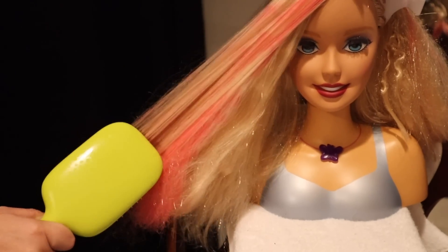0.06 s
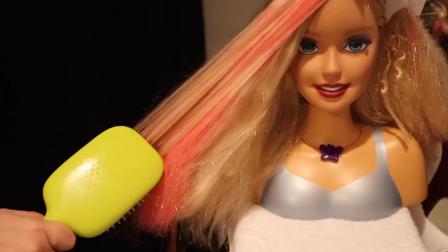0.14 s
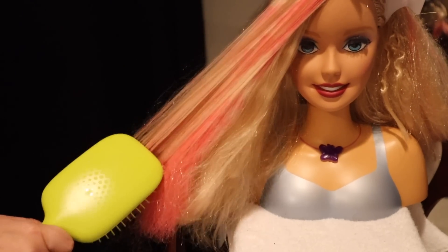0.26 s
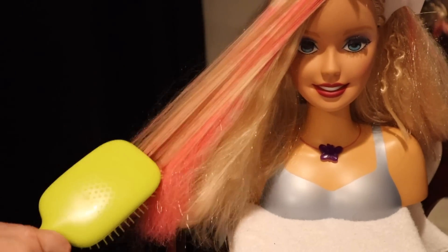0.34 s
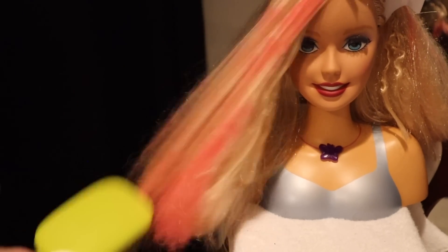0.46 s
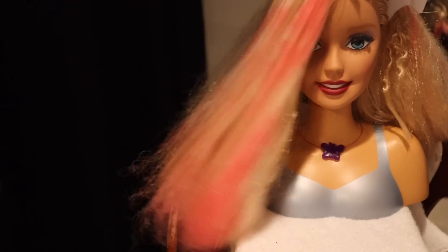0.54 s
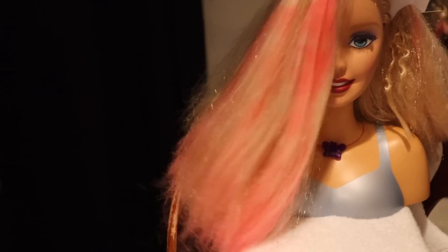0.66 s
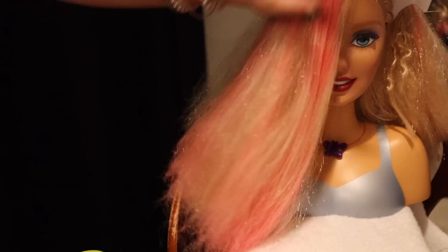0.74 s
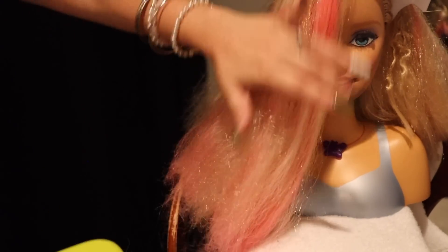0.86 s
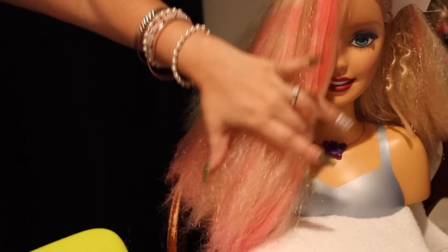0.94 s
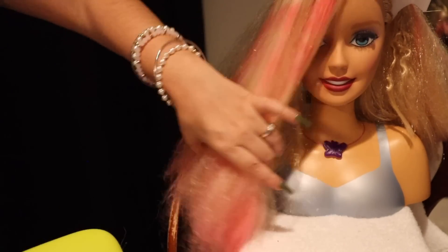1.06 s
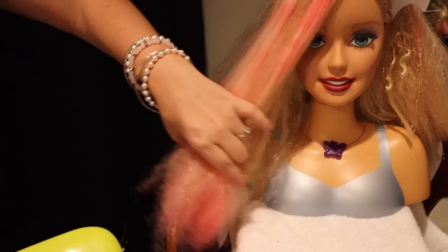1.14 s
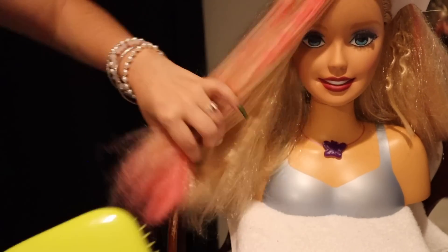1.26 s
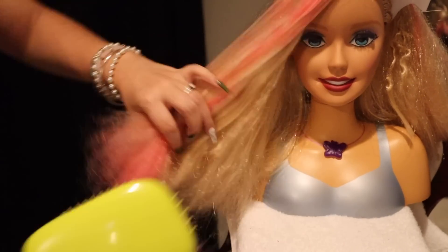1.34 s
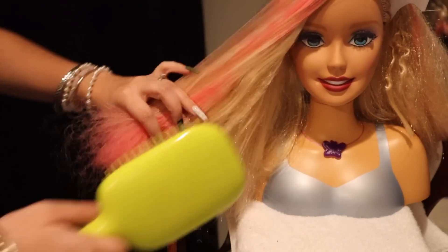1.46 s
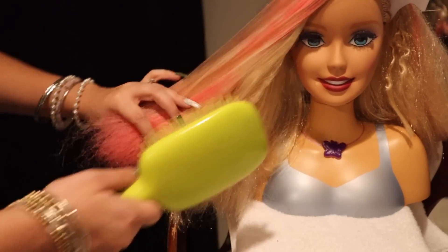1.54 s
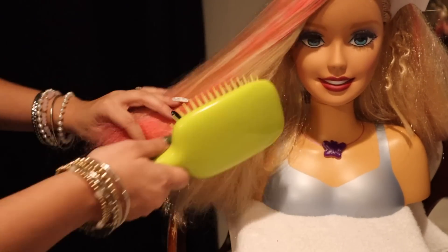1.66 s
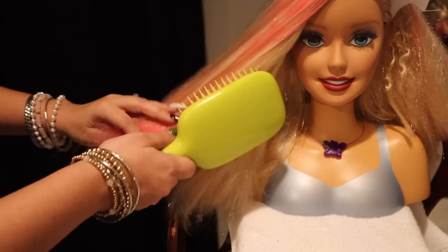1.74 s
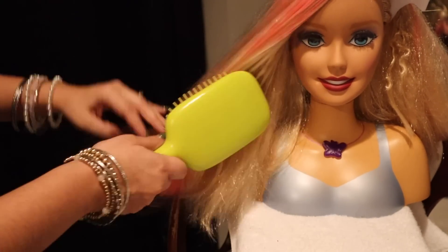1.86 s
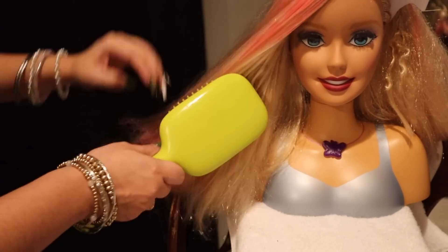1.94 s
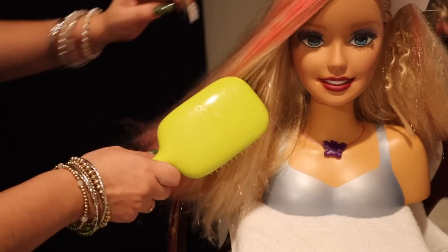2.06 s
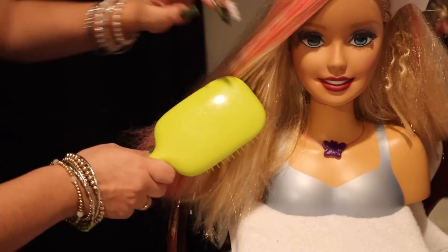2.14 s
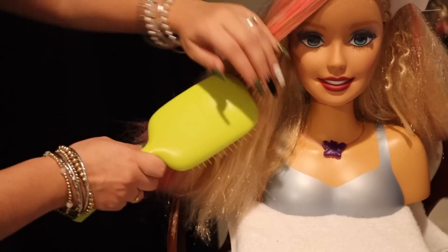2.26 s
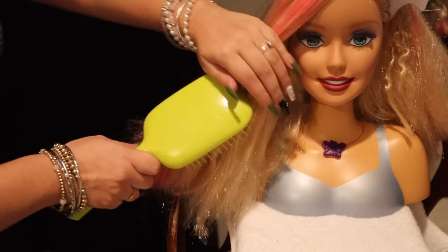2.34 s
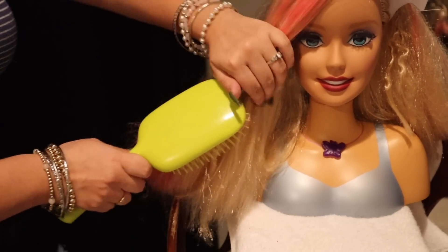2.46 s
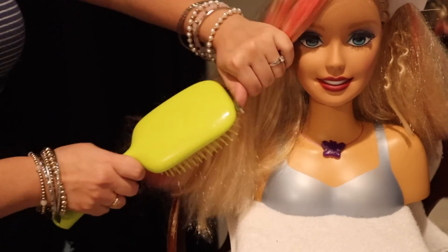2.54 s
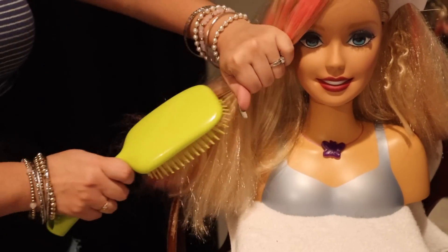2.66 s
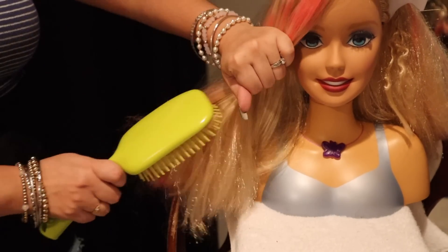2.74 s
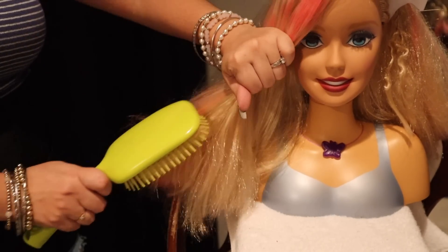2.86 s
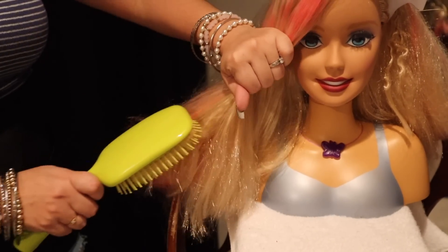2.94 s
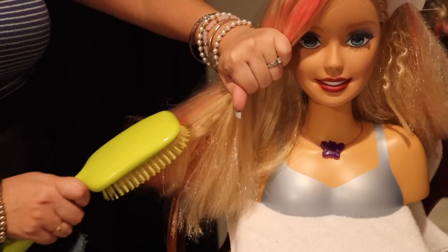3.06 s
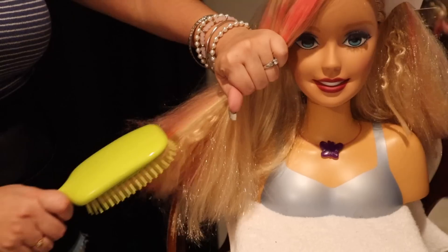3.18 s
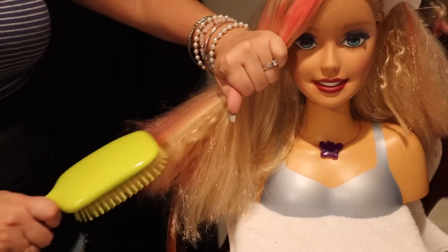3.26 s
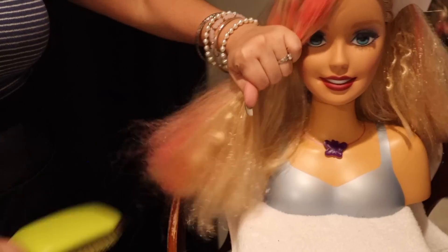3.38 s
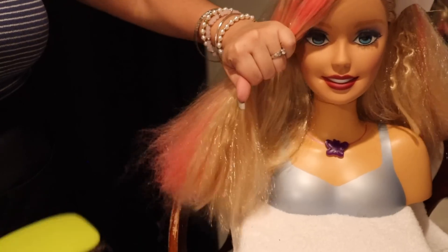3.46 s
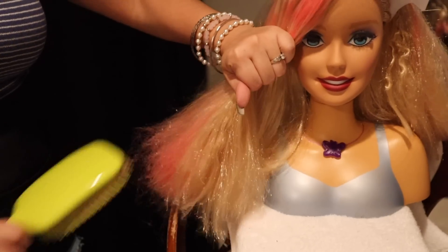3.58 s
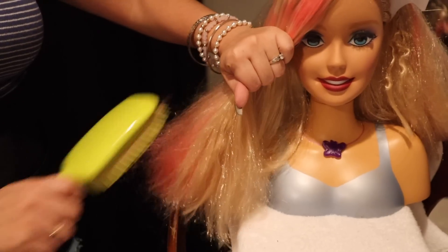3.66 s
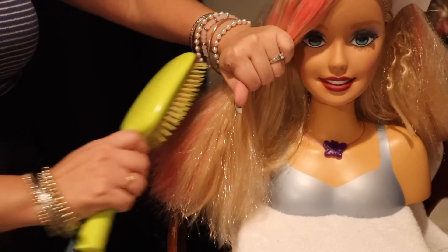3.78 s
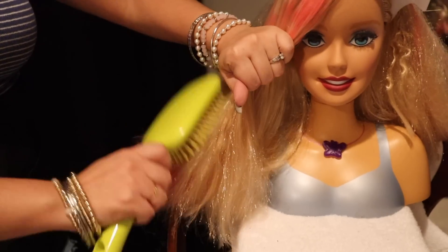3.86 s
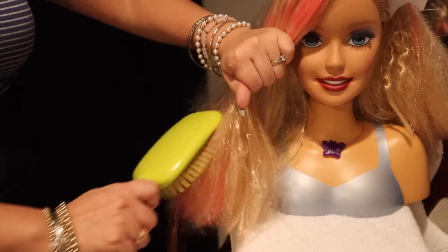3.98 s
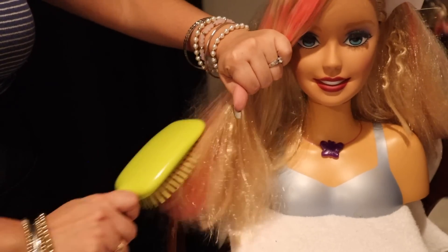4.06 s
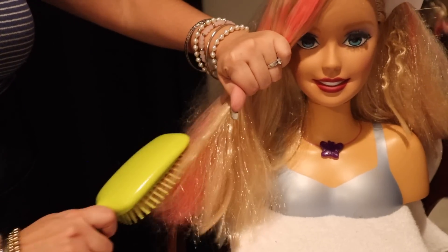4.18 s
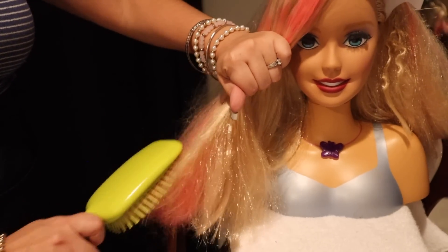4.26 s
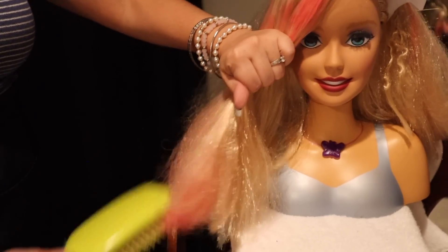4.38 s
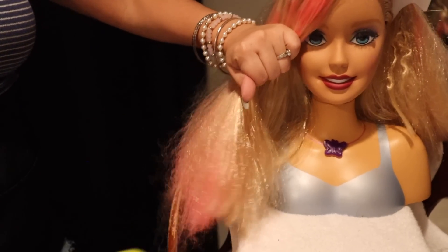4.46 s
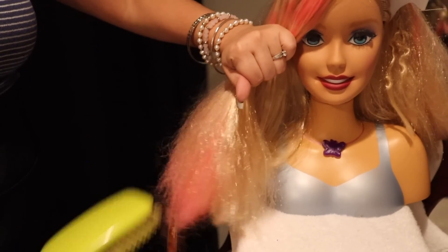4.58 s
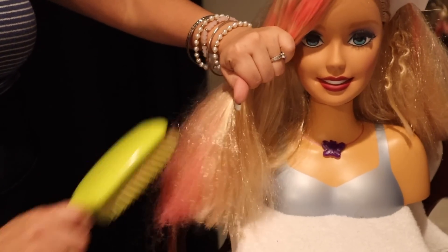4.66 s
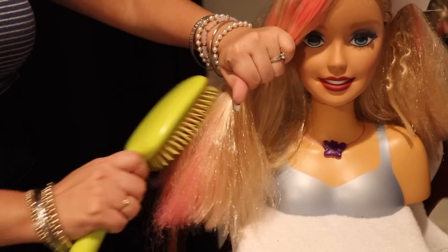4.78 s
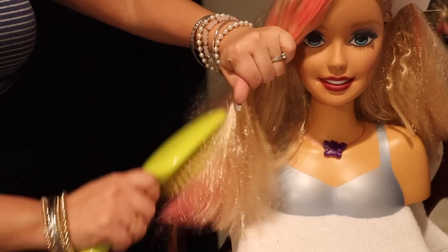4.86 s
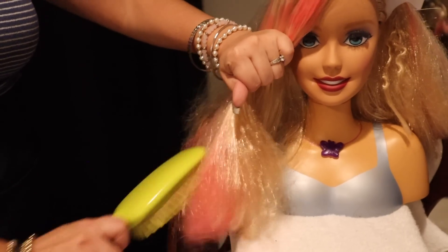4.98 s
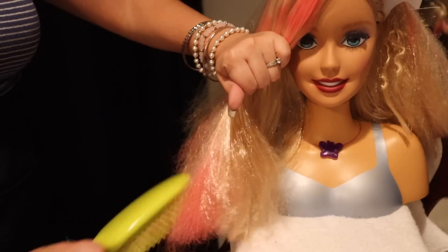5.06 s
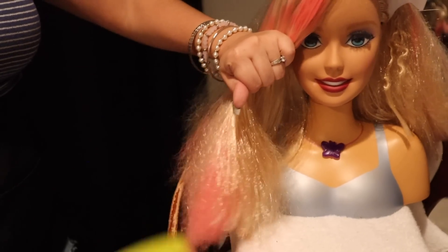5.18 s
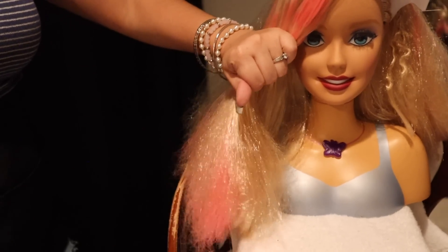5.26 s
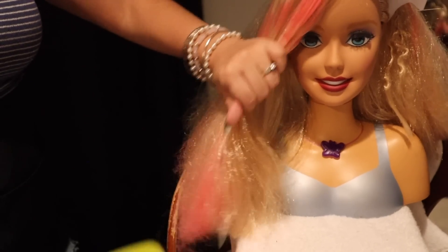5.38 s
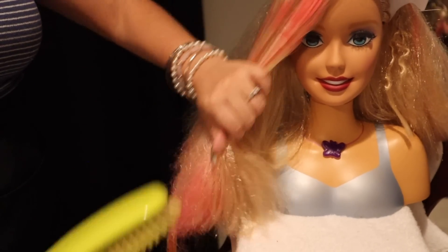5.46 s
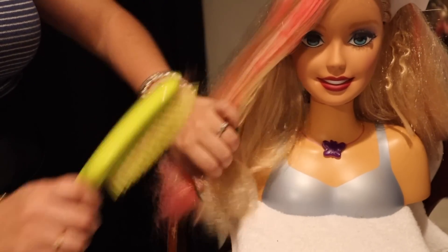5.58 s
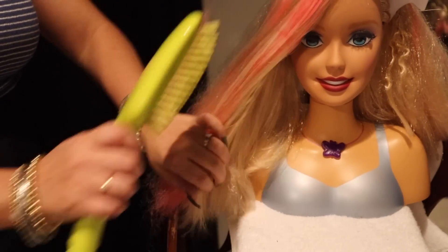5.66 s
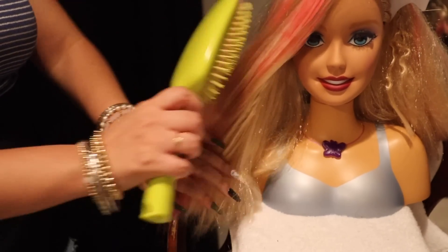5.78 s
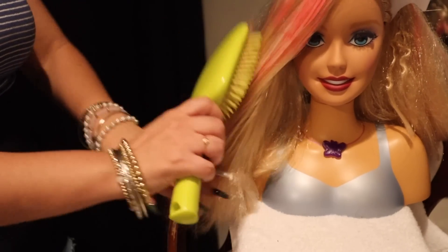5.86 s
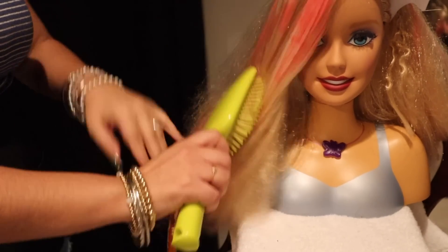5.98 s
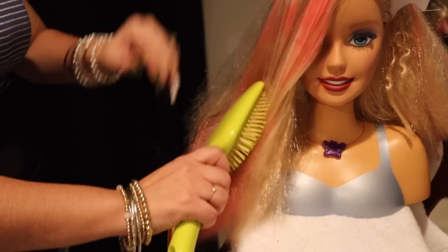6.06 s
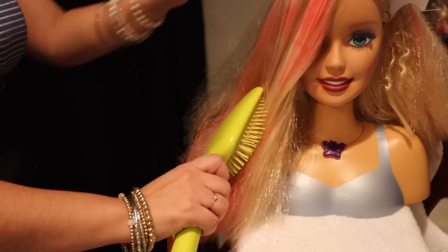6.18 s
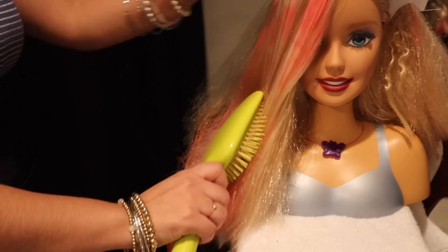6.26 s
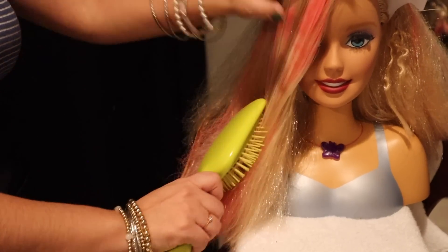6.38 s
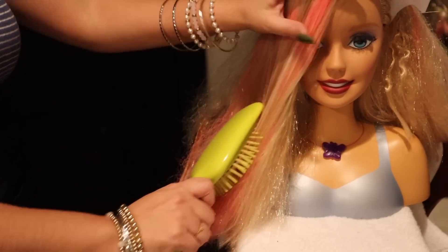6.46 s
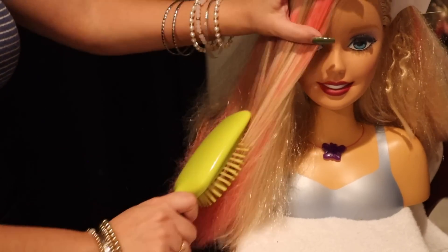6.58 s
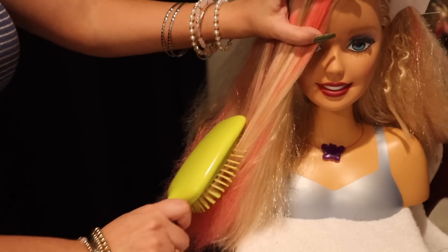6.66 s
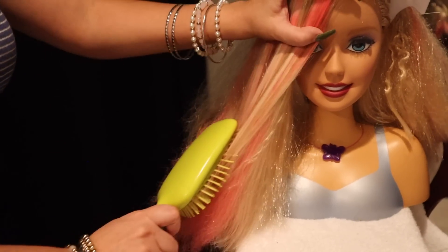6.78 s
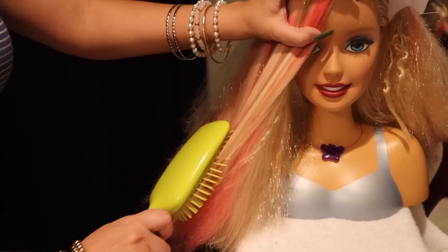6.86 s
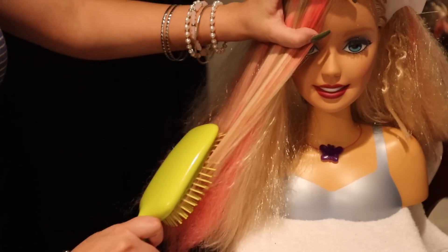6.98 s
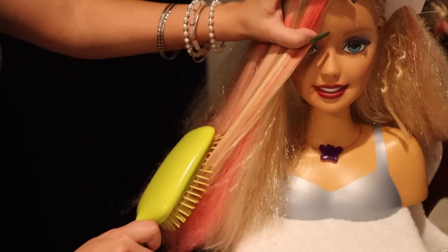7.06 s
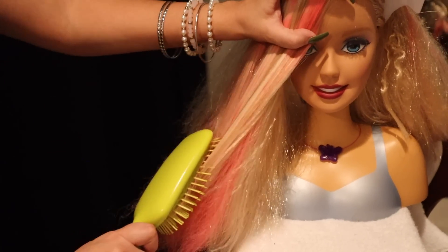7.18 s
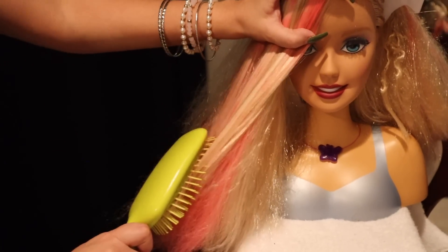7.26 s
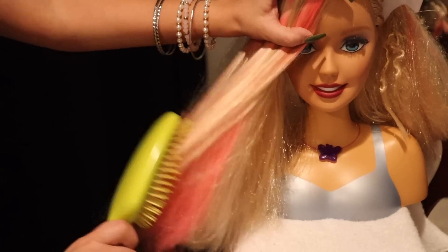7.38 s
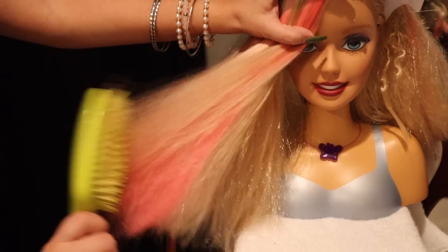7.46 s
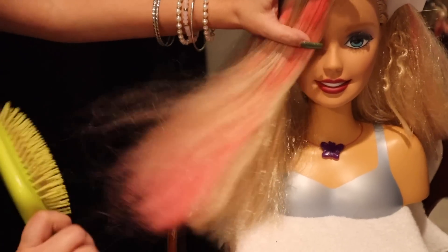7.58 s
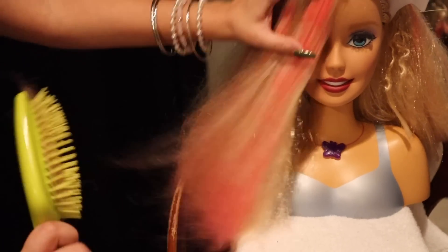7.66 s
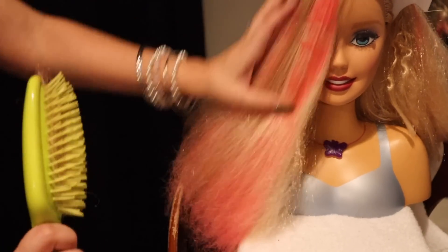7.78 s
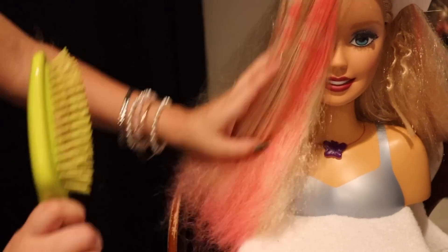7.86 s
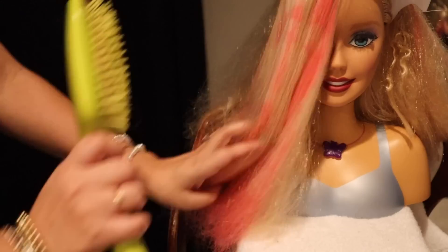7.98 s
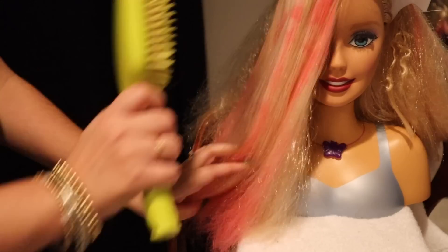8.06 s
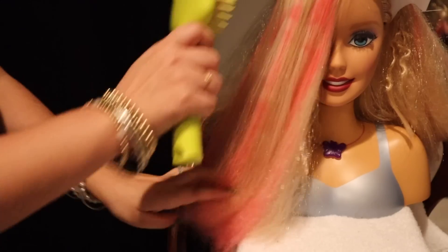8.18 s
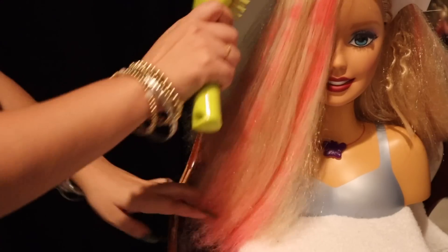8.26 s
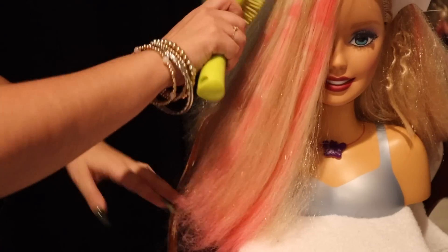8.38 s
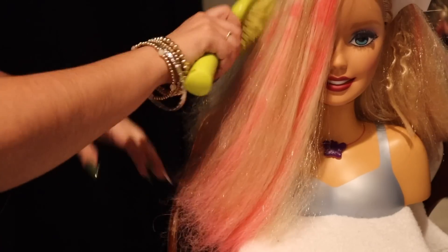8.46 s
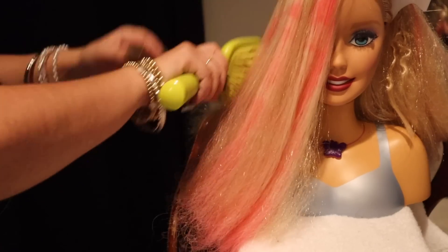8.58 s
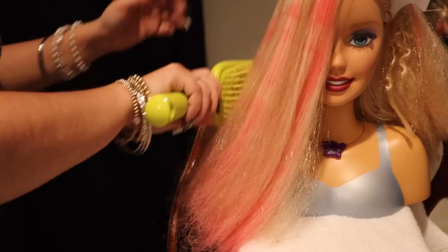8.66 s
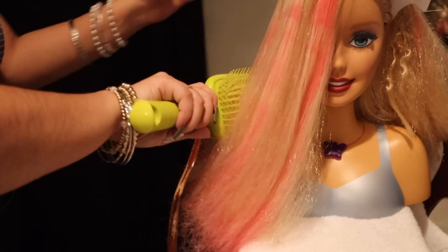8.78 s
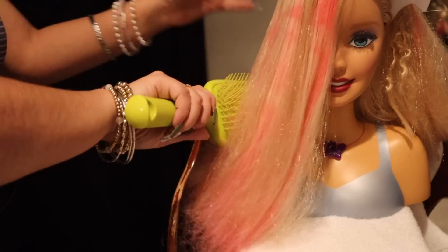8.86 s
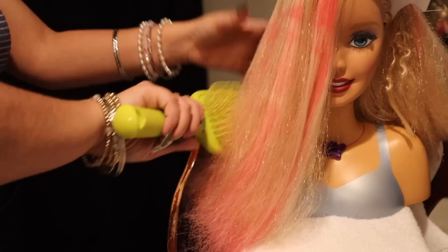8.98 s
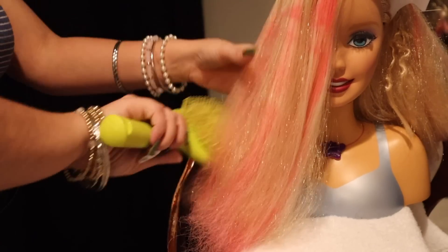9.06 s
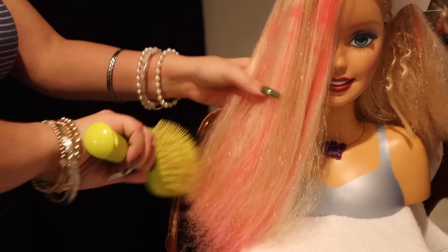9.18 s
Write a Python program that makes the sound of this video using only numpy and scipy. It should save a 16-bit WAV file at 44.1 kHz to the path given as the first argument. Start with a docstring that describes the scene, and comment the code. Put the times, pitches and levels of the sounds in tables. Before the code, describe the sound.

A plastic paddle brush scrapes and snaps through a doll's tangled synthetic hair while thin metal bangles clink and jangle in a quiet room.

```python
"""A plastic paddle brush is pulled through a doll's tangled hair, close to a mono camera microphone in a quiet room.
Slipping hairs and knots letting go are random impulses and noise bursts that ring the brush, bristles and head.
Thin metal bangles on both wrists clink as decaying sines and jangle as dense filtered impulses; late on, the brush
bumps the stand with low swings. A short room answer, a hum, uneven rumble and hiss lie around and underneath."""
import sys
import numpy as np
from scipy import signal
from scipy.fft import rfft, irfft, next_fast_len
from scipy.io import wavfile

SR = 44100
rng = np.random.default_rng(int(sys.argv[2]) if len(sys.argv) > 2 else 0)


def unload_audio(sound):
    """Save the sound as a 16-bit wav file, at the path given as the first command line argument."""
    columns = np.transpose(np.atleast_2d(sound))
    # keep every value between -1 and 1, then stretch to whole-number steps
    steps = np.round(np.clip(columns, -1, 1) * 32767)
    wavfile.write(sys.argv[1], SR, steps.astype(np.int16))


N = 407043

# Brush strokes, one list of rows each, before trim.
# Each row: time in seconds, drag on the brush in dB, tug on the head in dB, bristle crackle in dB.
STROKES = [
    [(0.0, -51, -51, -62), (0.04, -66, -60, -77), (0.104, -59, -54, -65), (0.38, -62, -61, -72),
     (0.456, -45, -44, -61), (0.54, -38, -40, -44), (0.572, -48, -52, -50), (0.72, -58, -64, -67)],
    [(1.3, -58, -73, -57), (1.32, -62, -63, -61), (1.504, -47, -60, -52), (1.548, -56, -73, -61),
     (1.582, -65, -59, -68), (1.62, -60, -73, -62)],
    [(2.4, -60, -61, -62), (2.988, -53, -52, -61), (3.156, -52, -55, -61), (3.28, -45, -46, -60)],
    [(3.28, -47, -52, -62), (3.344, -34.5, -34, -44), (3.446, -43, -49, -46), (3.474, -51, -51, -57),
     (3.492, -27, -34, -35), (3.518, -37, -32, -39), (3.562, -51, -58, -50), (3.62, -58, -54, -61)],
    [(3.9, -74, -62, -77), (3.92, -46, -55, -46), (3.964, -51, -49.5, -66), (4.17, -51, -49, -53),
     (4.214, -42, -45, -54), (4.262, -54, -54, -67), (4.298, -51, -38, -56), (4.342, -43, -42, -51),
     (4.446, -42, -36, -56), (4.58, -71, -73, -77)],
    [(4.93, -48, -50, -54), (4.944, -56, -49, -56), (4.954, -35, -45, -48), (5.026, -45, -46, -51),
     (5.126, -39, -42, -53), (5.148, -44, -39, -54), (5.23, -41, -47, -54), (5.236, -46, -46, -49)],
    [(5.95, -68, -63, -76), (5.978, -59, -55, -69), (6.426, -58, -63, -72), (6.454, -53, -46, -53),
     (6.504, -56, -60, -73), (6.638, -47, -48, -54), (6.662, -54, -56, -59), (6.87, -49, -49, -54),
     (6.956, -51, -44, -63), (6.976, -60, -54, -61), (7.018, -42, -50, -50), (7.106, -49, -46, -59),
     (7.168, -68, -64, -75), (7.212, -42, -46, -61), (7.23, -57, -55, -65), (7.386, -54, -58, -59),
     (7.452, -36.5, -35, -45), (7.516, -34.5, -34.5, -47), (7.64, -69, -66, -75), (7.68, -72, -55, -70)],
    [(8.55, -59, -58, -62), (8.678, -58, -57, -61), (9.074, -54, -55.5, -61), (9.23, -46, -46, -61)],
]
# Faint handling all along. Each row: one level in dB, for drag, tug and crackle in turn.
FAINT_HANDLING = [
    [-62],
    [-59],
    [-63.5],
]
# Knots letting go and knocks, before trim.
# Each row: start in seconds, level in dB of back, rim, head and bristle tips.
SNAP_BLOWS = [(.083, -53, -49, -48, -66), (.372, -62, -62, -66, -47), (.442, -33, -46, -40, -59),
              (.515, -29, -40, -38, -48), (.536, -40, -38, -37, -40), (1.027, -47, -50.5, -50, -48),
              (1.172, -55, -60, -66, -37), (1.367, -56, -44, -64, -50), (1.378, -58, -48, -64, -47),
              (1.415, -57, -49, -58, -41), (1.45, -57, -44, -62, -52), (1.473, -53, -39.5, -58, -50),
              (1.497, -55, -40, -62, -48), (1.51, -55, -40, -62, -50), (1.525, -57, -44, -62, -54),
              (2.451, -26, -30, -38, -49), (2.735, -26, -31, -37, -36.5), (2.81, -36, -33, -44, -55),
              (2.823, -30.5, -21.5, -29, -32.5), (2.883, -26, -23.5, -30, -32), (2.926, -40, -50, -38, -61),
              (3.087, -50, -40, -53, -52), (3.125, -23, -22.5, -34.5, -44.5), (3.223, -39, -41, -40, -59),
              (3.296, -48, -33, -46, -39), (3.322, -32, -20, -42, -40), (3.345, -36, -27, -32, -33),
              (3.389, -29, -27.5, -33, -24), (3.418, -43, -39, -49, -27), (3.44, -43, -38, -50, -24),
              (3.488, -35, -23.5, -40, -43), (3.498, -45, -24, -35, -30), (3.916, -39, -47, -47, -36),
              (4.107, -54, -52, -50, -47), (4.141, -53, -46, -48, -46), (4.216, -30, -43, -45, -58),
              (4.3, -50, -52, -37, -57), (4.953, -26, -31, -45, -48), (4.979, -28.5, -30, -43, -39),
              (5.03, -45, -42, -50, -44), (5.047, -32, -40, -46, -36.5), (5.279, -45, -33, -60, -36),
              (6.166, -58, -47, -62, -43), (6.455, -52, -48, -47, -45), (6.608, -46, -43, -42, -48),
              (6.732, -54, -38.5, -47, -46), (6.813, -57, -46, -47, -47), (6.855, -47, -37.5, -50, -45),
              (6.885, -46, -45, -42, -46), (6.945, -38, -56, -37.5, -49), (7.007, -46, -39, -46, -49),
              (7.034, -36, -40, -45, -39), (7.086, -34.5, -42, -37, -48), (7.205, -54, -37, -47.5, -46),
              (7.299, -53, -44, -60, -46), (7.34, -52, -46, -55, -48), (7.407, -50, -39, -44, -39),
              (7.425, -32, -40, -34, -34), (7.442, -27, -40, -34, -39), (7.459, -27, -33, -32, -33.5),
              (7.5, -22, -39, -37, -41), (7.513, -25, -33, -40, -31), (7.591, -43, -51, -48, -40),
              (8.756, -35, -30.5, -43, -32.5), (8.784, -35, -28.5, -38, -26), (9.19, -31, -43, -46, -49.5)]
SNAP_T60_S, PAD_UNDER_DB = .021, 9  # burst decay; the pad lies under the mean of rim and tips
# Something hard strikes the brush. Each row: start in seconds, level in dB before trim.
HARD_BLOWS = [(4.839, -16.5), (5.25, -19.5), (8.493, -18.5)]
# Share of a hard blow: back, rim, head, pad and tips, in dB relative to its level.
HARD_BLOW_SHARES = [-8, -12, -21, -8.5, 0]
HARD_BLOW_T60_S = .038
# Resonances of the brush's hollow back. Each row: centre in Hz, width in Hz, level in dB.
BACK_MODES = [(498, 41, 0.5), (648.4, 72, 1.6)]
# Resonances of its stiff rim. Each row: centre in Hz, width in Hz, level in dB.
RIM_MODES = [(869, 89, -0.5), (1077, 100, -3), (1221, 87, -2), (1373, 98, -4.5)]
# Resonances of the doll's head on its stand. Each row: centre in Hz, width in Hz, level in dB.
HEAD_MODES = [(159, 44, -4.5), (238.8, 57, 1), (403.4, 97, -1)]
# Resonances of the bristle pad. Each row: centre in Hz, width in Hz, level in dB.
PAD_MODES = [(1530, 400, -0.5), (1954, 310, 4.5), (2420, 800, -1), (4100, 2600, -9.5)]
# Resonances of the bristle tips. Each row: centre in Hz, width in Hz, level in dB.
TIP_MODES = [(3414, 64, 0.2), (4150, 640, 5.5), (4935, 150, -5), (5970, 2500, -10), (10000, 3700, -18)]

# Decay of the room's answer. Each row: frequency in Hz, t60 in seconds.
ROOM_DECAY = [(200, 0.11), (2000, 0.21), (12000, 0.098)]

# The hum: frequency in Hz, width in Hz of each wavering resonance, rms in dB before the microphone.
HUM_TONE = (56.5, 5.6, -54)
# Rumble before the microphone. Each row: time in seconds, deep rms in dB, upper rms in dB.
RUMBLE_LEVELS = [(0.0, -54, -56), (0.23, -69, -61), (0.54, -54, -54.5), (0.97, -72, -58.5),
                 (1.28, -50, -58), (1.67, -65, -62), (3.16, -57, -59.5), (3.44, -49, -57),
                 (3.73, -63, -60.5), (8.17, -58, -58.5), (8.61, -72, -63), (8.82, -46, -52.5),
                 (9.18, -67, -62), (9.23, -61, -58)]
# Colour of the hiss. Each row: frequency in Hz, relative level in dB.
HISS_COLOUR = [(41, 8.5), (70, -7), (203, -6), (482, -18.5), (552, -35), (662, -18), (813, -10.5),
               (2160, -16.5), (4560, -16.5), (14900, -21.5), (15900, -35)]
HISS_DB = -53  # rms before the microphone's band limits

# Modes of the low slim bangle. Each row: frequency in Hz, level in dB, t60 in seconds.
SLIM_LOW_MODES = [(5147, -15, .22), (8290, 0, .3), (8358, -11, .2)]
# Modes of the high slim bangle. Each row: frequency in Hz, level in dB, t60 in seconds.
SLIM_HIGH_MODES = [(12125, 0, .22), (12195, -4, .2)]
# Modes of the wide bangle. Each row: frequency in Hz, level in dB, t60 in seconds.
WIDE_MODES = [(4685, -9, .25), (6775, -6, .25), (6895, -9, .25), (9410, -4, .3), (9458, -9, .25),
              (11205, -3, .3), (11280, 0, .3), (12355, -3, .25), (12400, -6, .25)]
# Modes of the beaded bangle. Each row: frequency in Hz, level in dB, t60 in seconds.
BEADED_MODES = [(1980, -17, .08), (3525, -12, .15), (5190, -14, .12), (6610, -8, .15), (6690, -5, .15),
                (8340, -9, .12), (9080, -9, .12), (9180, -8, .15), (10660, -4, .15), (10745, 0, .15),
                (11790, -8, .15), (12225, -4, .15), (12300, -7, .15), (12960, -10, .12), (15090, -7, .15),
                (15520, -6, .15), (15640, -4, .15)]
# Modes of the small bangle. Each row: frequency in Hz, level in dB, t60 in seconds.
SMALL_MODES = [(9905, 0, .2), (13000, -9, .15)]
# The grip on the wrist shifts each ring's pitch from blow to blow: spread as a share of pitch,
# for slim low, slim high, wide, beaded and small.
PITCH_SPREAD = [.0008, .001, .0008, .004, .001]
# Bangle contacts, before trim.
# Each row: start in seconds, click level in dB, then a bangle and its ring level in dB for each that rings.
CONTACTS = [(.536, -38, "beaded", -51, "slim low", -51, "slim high", -53),
            (.941, -40, "slim low", -51, "slim high", -49.5), (1.027, -18, "wide", -45),
            (1.063, -24, "wide", -62), (1.086, -25.5, "wide", -60),
            (1.122, -23, "slim low", -45, "slim high", -45), (1.168, -27),
            (1.173, -21, "slim low", -38, "slim high", -47), (1.256, -35, "wide", -63),
            (1.305, -27, "slim high", -49, "slim low", -61), (1.361, -46, "small", -53),
            (1.417, -38, "slim high", -63), (1.465, -42, "beaded", -54), (1.556, -29, "beaded", -53),
            (1.593, -43, "slim high", -51, "beaded", -54), (1.612, -35, "slim low", -56),
            (1.713, -27, "wide", -55), (1.722, -28.5, "wide", -57), (1.743, -33, "beaded", -55),
            (1.768, -34, "beaded", -55), (1.961, -39, "slim low", -51, "slim high", -55, "wide", -60),
            (1.983, -33, "slim high", -53, "beaded", -54), (2.058, -42, "slim high", -52, "small", -55),
            (2.253, -39, "wide", -57), (2.282, -34, "wide", -67), (2.347, -31, "wide", -51.5),
            (2.4, -34, "wide", -54), (2.414, -29.5, "wide", -53), (2.452, -35, "slim low", -59),
            (2.586, -38, "slim low", -55, "slim high", -62), (3.1, -43, "slim low", -58, "slim high", -61),
            (2.822, -33, "wide", -58), (2.7, -33), (3.356, -37, "beaded", -56), (3.39, -38, "small", -54),
            (3.411, -26, "beaded", -53, "slim high", -55), (3.44, -34, "slim high", -54, "small", -58),
            (3.4925, -22, "beaded", -36, "slim high", -46, "slim low", -53),
            (3.565, -31, "beaded", -45, "slim high", -49), (3.577, -23, "beaded", -42),
            (3.657, -28, "wide", -58, "slim high", -60), (3.702, -27, "beaded", -48),
            (3.854, -26.5, "beaded", -61), (3.6, -33, "wide", -61), (3.914, -26, "wide", -64),
            (4.839, -23, "slim high", -42, "beaded", -49, "small", -48),
            (4.849, -18, "beaded", -44, "slim high", -51), (4.97, -34), (5.003, -35, "beaded", -55),
            (5.25, -22, "beaded", -37.5, "slim high", -48), (5.279, -26, "beaded", -56, "wide", -59),
            (5.676, -33, "wide", -55.5), (5.945, -37, "slim high", -57, "slim low", -61),
            (6.166, -17.5, "slim high", -39, "slim low", -46), (6.206, -26, "wide", -57),
            (6.237, -37, "slim high", -53, "slim low", -58),
            (6.424, -36, "slim low", -50, "slim high", -54),
            (6.638, -35, "slim low", -53, "slim high", -58), (6.691, -31, "slim high", -50),
            (6.72, -40, "wide", -54, "beaded", -57), (7.104, -34.5, "wide", -60.5), (7.514, -34),
            (7.59, -35), (7.815, -43, "wide", -49), (7.84, -36, "wide", -51, "beaded", -56),
            (7.4, -34, "beaded", -65), (8.1, -30, "wide", -48.5), (8.13, -28.5, "slim high", -65),
            (8.27, -40, "beaded", -52), (8.31, -36, "small", -61),
            (8.495, -41, "slim high", -51, "beaded", -55),
            (8.511, -38, "beaded", -48, "slim high", -52, "slim low", -56), (8.588, -35, "small", -63),
            (8.702, -37, "slim high", -47, "slim low", -55), (8.756, -32, "wide", -49.5),
            (8.823, -47, "wide", -50.5), (8.885, -32, "beaded", -48), (8.912, -32, "beaded", -58),
            (8.984, -25, "small", -50)]
# The stack of bangles rattling, before trim.
# Each row: peak time in seconds, level in dB, swell and fade in seconds per 31 dB, what shakes.
JANGLES = [(.56, -37, .08, 0.14, "metal"), (1.03, -41, .01, .7, "pearls"),
           (1.484, -45, 0.045, .035, "metal"), (1.608, -47, .11, .11, "metal"),
           (1.76, -49, .12, .12, "metal"), (3.44, -38, 0.12, .1, "metal"),
           (3.494, -21.5, .012, 0.053, "metal"), (3.578, -34.5, .025, 0.085, "metal"),
           (3.708, -40, .2, 0.079, "metal"), (3.922, -49, .23, .085, "metal"),
           (4.848, -26, 0.017, .04, "metal"), (5.024, -40.5, 0.05, 0.028, "metal"),
           (5.27, -35.5, 0.043, 0.12, "metal"), (6.169, -26, 0.0055, 0.017, "pearls"),
           (8.522, -38.5, 0.065, .05, "metal"), (8.916, -52, .15, .04, "metal"),
           (8.988, -33.5, .011, 0.038, "metal")]
# Colour of metal on metal. Each row: frequency in Hz, relative level in dB.
CLICK_COLOUR = [(1000, -26), (3000, -2), (6000, -4), (10000, 2), (16000, -4)]

# The brush bumps the stand.
# Each row: start in seconds, starting level in dB before the microphone, frequency in Hz, t60 in seconds.
STAND_BUMPS = [(8.769, -24.5, 281, 0.087), (8.812, -35, 55.5, 0.18)]

TOP_HZ = 15850  # the camera's band limit


def amp(db):
    """Gain of a level in dB."""
    return 10 ** (np.asarray(db) / 20)


def unit(x):
    """x at rms 1."""
    return x / np.sqrt(np.mean(x ** 2) + 1e-20)


def along(points, hz):
    """(Hz, value) points read on a log frequency axis."""
    f, v = np.transpose(points)
    return np.interp(np.log(hz + 1), np.log(f + 1), v)


def curves(rows, **ends):
    """One value per sample for each column after the time."""
    s, *cols = np.transpose(rows)
    return [np.interp(np.arange(N) / SR, s, c, **ends) for c in cols]


def filtered(x, response):
    """x passed through a complex response of frequency."""
    m = next_fast_len(N + SR // 2)
    return irfft(rfft(x, m) * response(np.fft.rfftfreq(m, 1 / SR)), m)[..., :N]


def resonances(peaks):
    """Causal response of (Hz, width, dB) resonances of alternating sign."""
    def response(f):
        return sum((-1) ** k * amp(db) * 1j * f * w / (c * c - f * f + 1j * f * w)
                   for k, (c, w, db) in enumerate(peaks))
    return response


def coloured(points):
    """Zero-phase response of (Hz, dB) points."""
    return lambda f: amp(along(points, f))


def slips(rate, spread_db):
    """Random impulses, rate a second on average, of uneven size."""
    hits = rng.random(N) < rate / SR
    return hits * rng.standard_normal(N) * amp(spread_db * rng.standard_normal(N))


def softly_pushed(peaks, top_hz):
    """Resonances pushed softly by hair: the force loses its treble above top_hz."""
    return lambda f: resonances(peaks)(f) / (1 + 1j * f / top_hz) ** 2


def brush():
    """Slipping hairs shake the brush, tug the head and flick the bristles; knots let go in short bursts."""
    bodies = (softly_pushed(BACK_MODES, top_hz=1210), softly_pushed(RIM_MODES, top_hz=1910),
              softly_pushed(HEAD_MODES, top_hz=615), softly_pushed(PAD_MODES, top_hz=4300),
              resonances(TIP_MODES))
    slip, tug, flick = [unit(slips(rate, spread_db=5)) + 0.9 * rng.standard_normal(N)
                        for rate in (450, 600, 500)]
    grain = np.array([slip, slip, tug, flick, flick])

    trim_db = [[3.0], [1.6], [-.8]]  # taken off drag, tug and crackle
    strokes = sum(amp(np.array(curves(rows, left=-150, right=-150)) - trim_db) for rows in STROKES)
    drag, pull, crackle = np.hypot(strokes, amp(FAINT_HANDLING))
    tips = np.hypot(strokes[2], amp(-12) * crackle)  # faint handling hardly bends the tips; a stroke does
    body_gain = amp([[-1.5], [-4], [-.1], [-1.2], [-7.5]])
    push = grain * [drag, drag, pull, crackle, tips] * body_gain
    push = np.pad(push, ((0, 0), (0, SR)))

    blows = [(s, [back, rim, head, (rim + tip) / 2 - PAD_UNDER_DB, tip], SNAP_T60_S)
             for s, back, rim, head, tip in SNAP_BLOWS]
    blows += [(s, np.add(db, HARD_BLOW_SHARES), HARD_BLOW_T60_S) for s, db in HARD_BLOWS]
    t = np.arange(SR // 8) / SR
    for s, level_db, t60 in blows:
        burst = amp(-60 * t / t60) * rng.standard_normal((len(bodies), len(t)))
        burst[:, :1] += [[12.5], [11.5], [8.5], [4.5], [3.5]]  # a strong first jerk
        gain = amp(np.add(level_db, [-5.5, -1.5, 6.0, 4.0, -3.5]))
        push[:, round(s * SR):][:, :len(t)] += gain[:, None] * burst

    # each body is levelled by its answer to the even, unshaped grain
    return sum(filtered(p[:N], body) / np.std(filtered(g, body)) for p, g, body in zip(push, grain, bodies))


def room(x):
    """Each frequency of the room's answer, a random tail, dies at its own speed."""
    step, out = SR // 4, np.zeros(N + SR)
    # a fresh random tail every quarter second keeps the answer smooth, with no fixed ringing
    for at in range(0, N, step):
        hz, t, z = signal.stft(rng.standard_normal(SR // 3), SR, nperseg=256)
        decay = amp(-60 * t / along(ROOM_DECAY, hz)[:, None])
        tail = signal.istft(z * decay, SR, nperseg=256)[1]
        answer = signal.fftconvolve(x[at:at + step], tail / np.linalg.norm(tail))
        out[at + 250:][:len(answer)] += answer  # 250 samples behind the direct sound
    return out[:N]


def background():
    """A steady hum with narrow noise around it, two bands of uneven rumble, and coloured hiss."""
    deep_db, upper_db = curves(RUMBLE_LEVELS)
    noise = rng.standard_normal((4, N))
    hz, width, hum_db = HUM_TONE

    def twice(c, w):
        return lambda f: resonances([(c, w, 0)])(f) ** 2

    steady = np.sin(2 * np.pi * hz * np.arange(N) / SR)
    wavering = unit(filtered(noise[0], twice(hz, width)))
    hum = amp(hum_db) * unit(2 * steady + wavering)
    deep = amp(deep_db) * unit(filtered(noise[1], twice(39.3, 19.0)))
    upper = amp(upper_db) * unit(filtered(noise[2], twice(111.0, 64)))
    hiss = amp(HISS_DB) * unit(filtered(noise[3], coloured(HISS_COLOUR)))
    return hum + deep + upper + hiss


def clinks():
    """Each contact is a noise click, and the bangles it touches ring as decaying sines."""
    t = np.arange(SR // 4) / SR
    names = "slim low", "slim high", "wide", "beaded", "small"
    tables = SLIM_LOW_MODES, SLIM_HIGH_MODES, WIDE_MODES, BEADED_MODES, SMALL_MODES
    modes = {name: (np.transpose(m)[..., None], loose)
             for name, m, loose in zip(names, tables, PITCH_SPREAD)}
    out, clicks = np.zeros(N + SR), np.zeros(N + SR)
    for s, click_db, *rings in CONTACTS:
        at = round(s * SR)
        for name, db in zip(rings[::2], rings[1::2]):
            (hz, level, t60), loose = modes[name]
            size, shift, phase = rng.standard_normal((3, len(hz), 1))  # where the blow lands
            swing = np.sin(2 * np.pi * (hz * (1 + loose * shift) * t + phase))
            ring = amp(level + 2.9 * size - 60 * t / t60) * swing
            out[at:][:len(t)] += amp(db - 1.5) * ring.sum(0)
        clicks[at:][:len(t)] += amp(click_db - 7 - 60 * t / 0.021) * rng.standard_normal(len(t))
    return out[:N] + filtered(clicks[:N], coloured(CLICK_COLOUR))


def jangle():
    """A shaken stack is dense impulses: all shakes tick, and those of metal also ring damped modes."""
    now = np.arange(N) / SR
    shakes = np.array([amp(db - 31 * np.maximum((s - now) / swell, (now - s) / fade))
                       for s, db, swell, fade, _ in JANGLES])
    metal = np.array([what == "metal" for *_, what in JANGLES])
    rattle = slips(rate=1500, spread_db=3.5)

    def shaken(response, shake):
        return filtered(rattle * shake, response) / np.std(filtered(rattle, response))

    # touching bangles shorten each other's ring
    damped = [(hz, 7.7 / t60, db) for hz, db, t60 in BEADED_MODES]
    ringing = shaken(resonances(damped), shakes[metal].sum(0))
    ticking = shaken(coloured(CLICK_COLOUR), shakes.sum(0))
    return amp(-6) * ringing + amp(-7.5) * ticking


def thud():
    """The bumped stand swings as short, low decaying sines."""
    out = np.zeros(N)
    for s, db, hz, t60 in STAND_BUMPS:
        since = np.clip(np.arange(N) / SR - s, 0, None)
        out += amp(db - 60 * since / t60) * np.sin(2 * np.pi * hz * since)
    return out


def scene():
    """All sources at one microphone, written to both channels; only brush and bangles excite the room."""
    near = brush() + clinks() + jangle()
    return np.tile(near + amp(-9) * room(near) + thud() + background(), (2, 1))


def record(dry):
    """The microphone loses the deepest bass; the camera keeps nothing above its band limit."""
    return filtered(dry, lambda hz: (hz < TOP_HZ) * (1j * hz / (34 + 1j * hz)) ** 2)


dry = scene()
out = record(dry)
unload_audio(out)
```